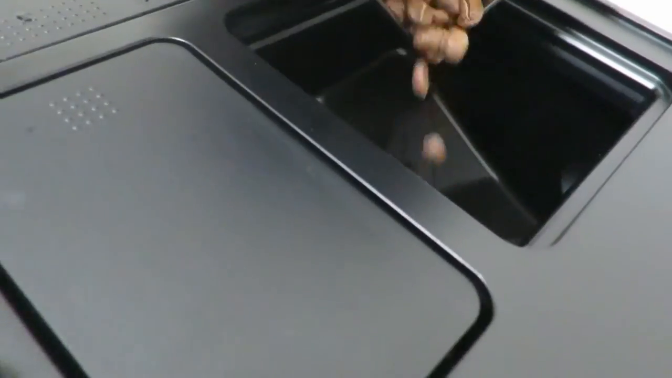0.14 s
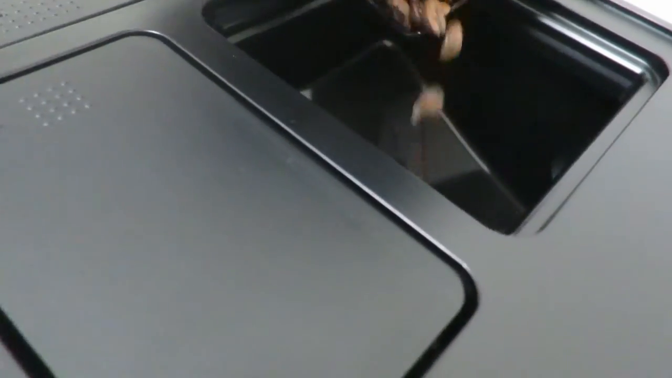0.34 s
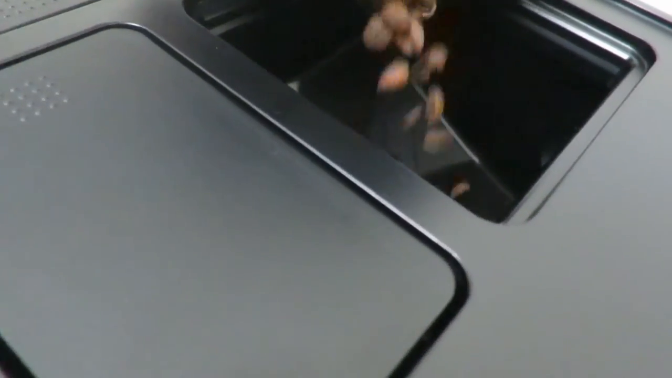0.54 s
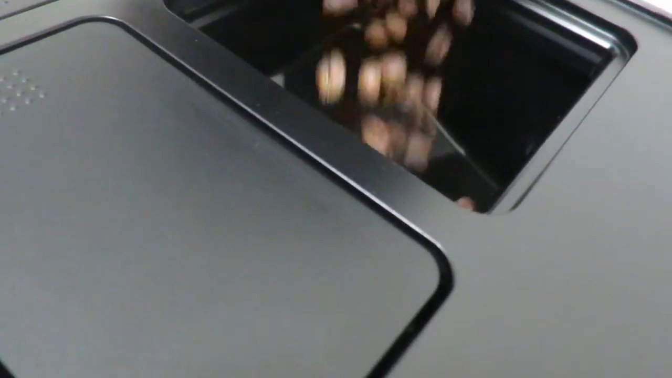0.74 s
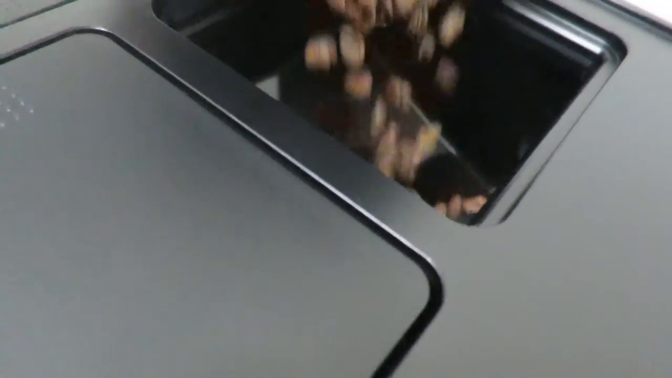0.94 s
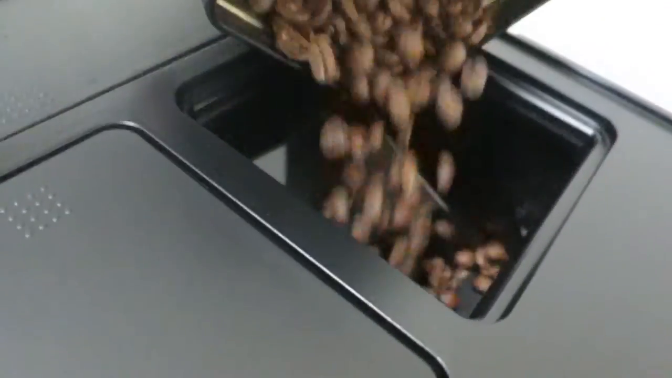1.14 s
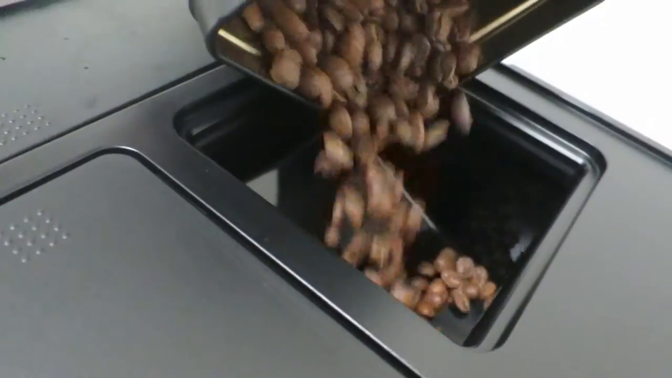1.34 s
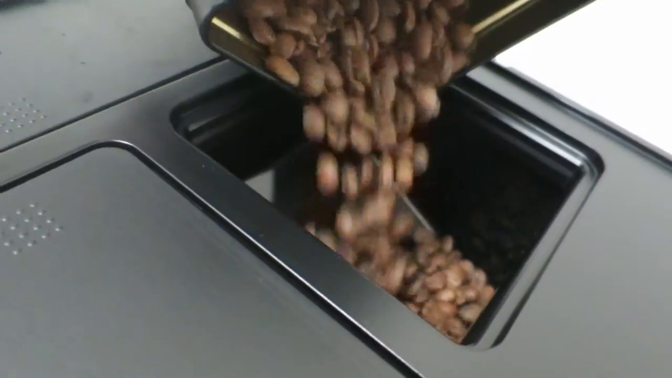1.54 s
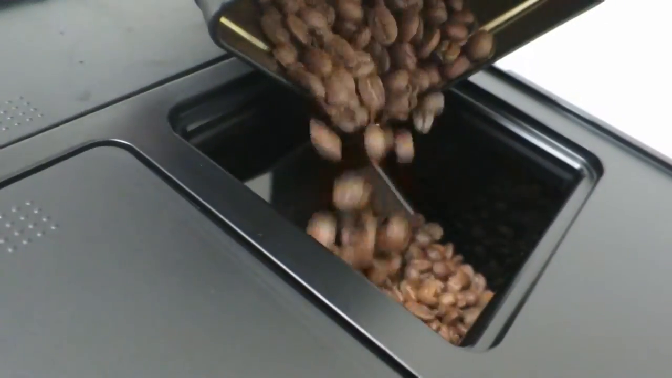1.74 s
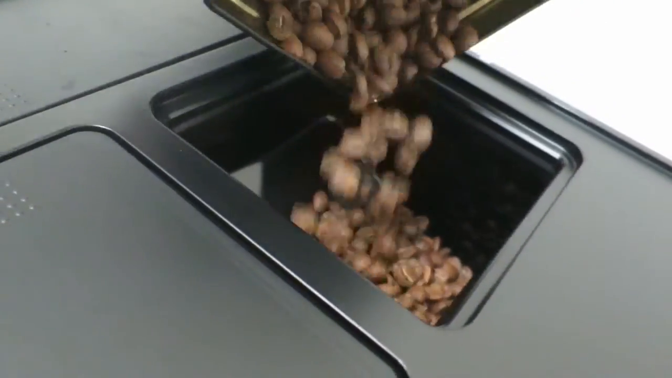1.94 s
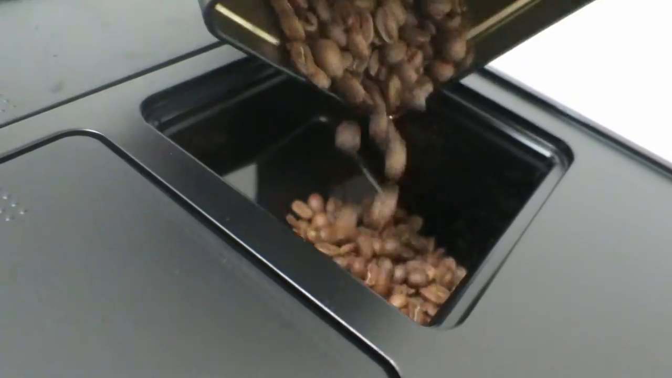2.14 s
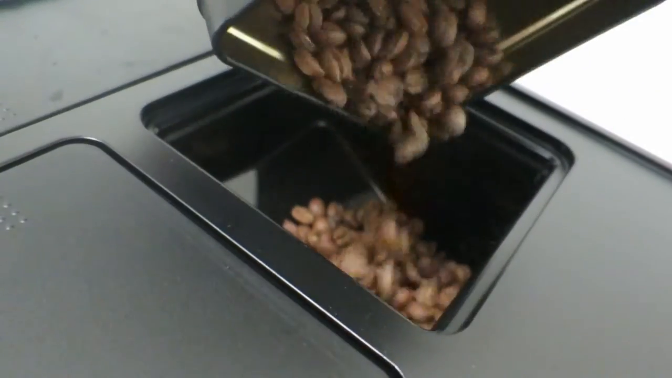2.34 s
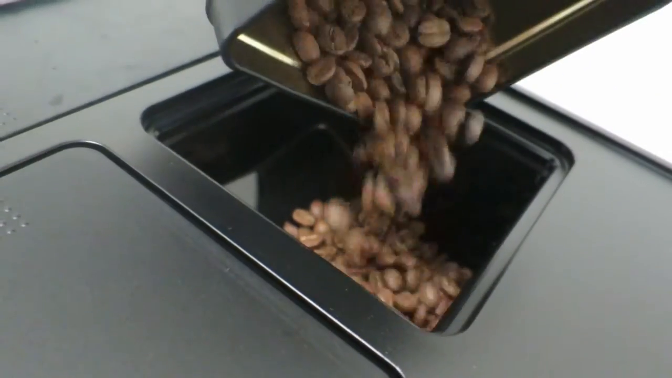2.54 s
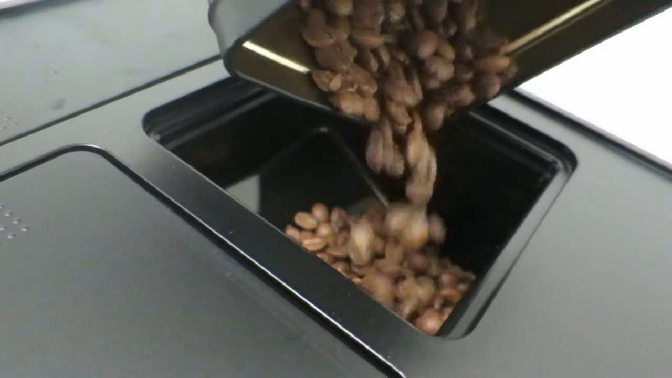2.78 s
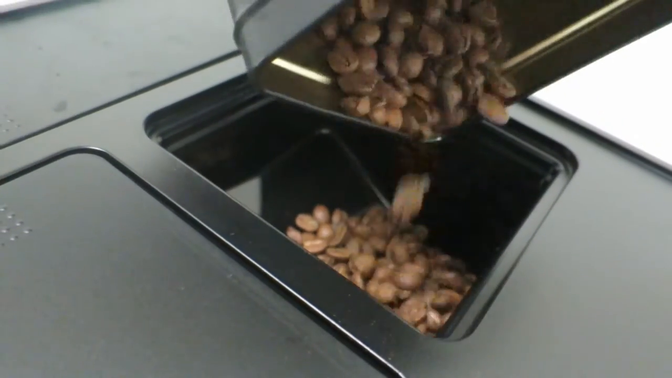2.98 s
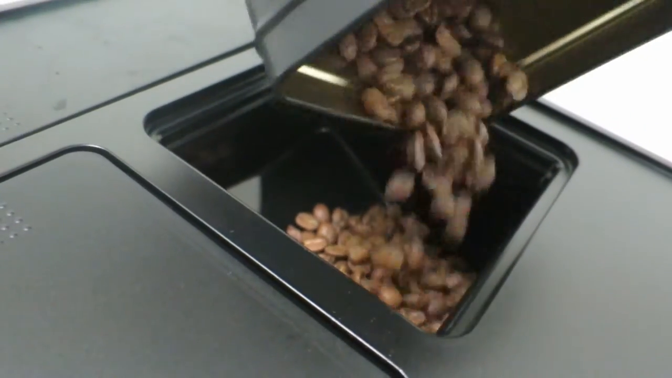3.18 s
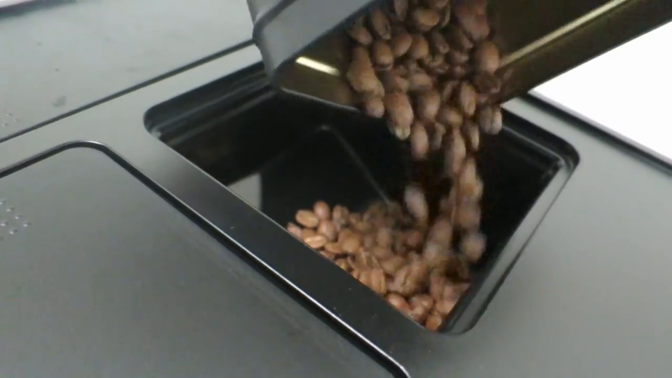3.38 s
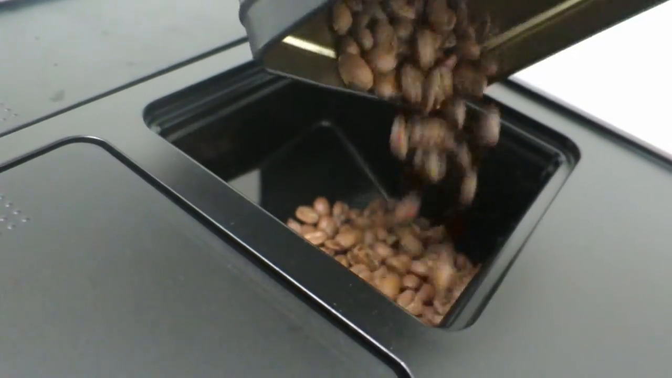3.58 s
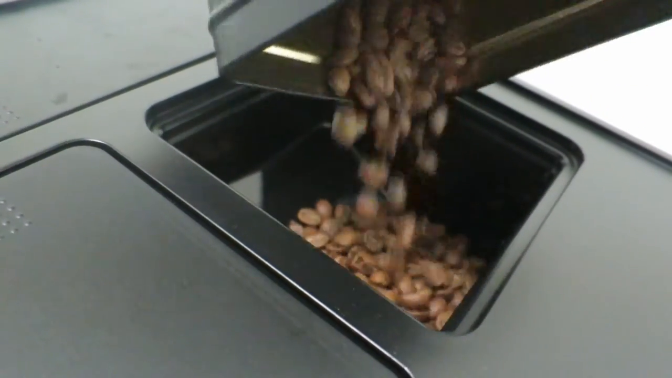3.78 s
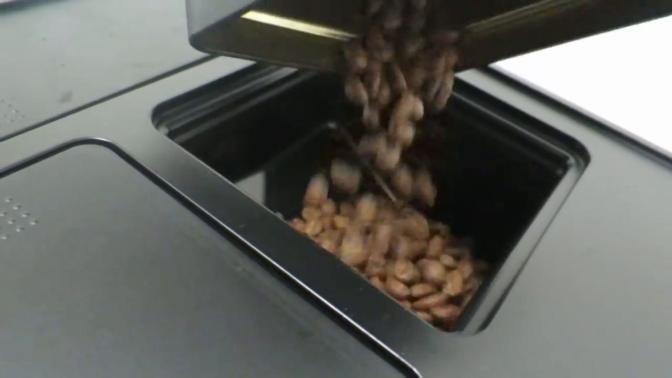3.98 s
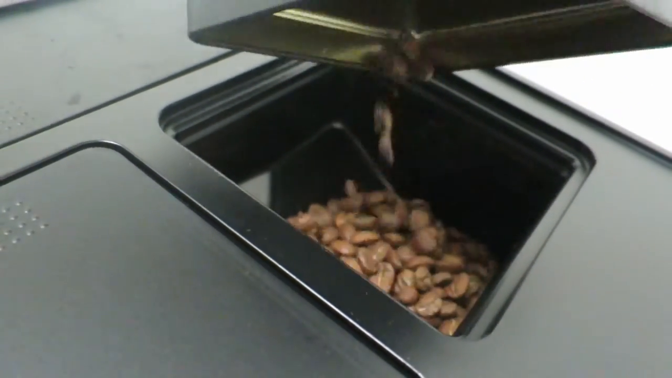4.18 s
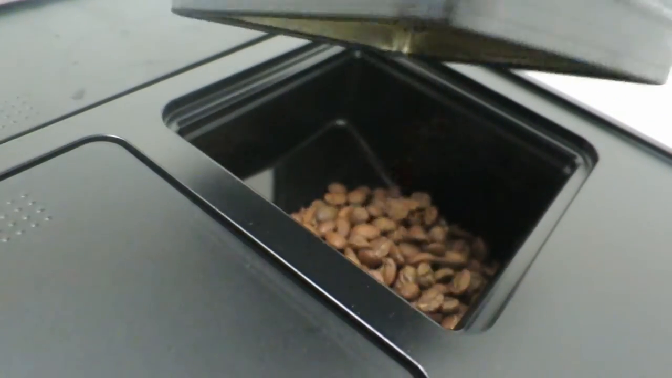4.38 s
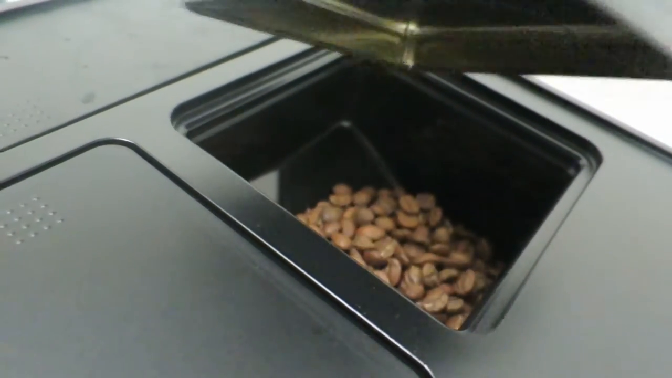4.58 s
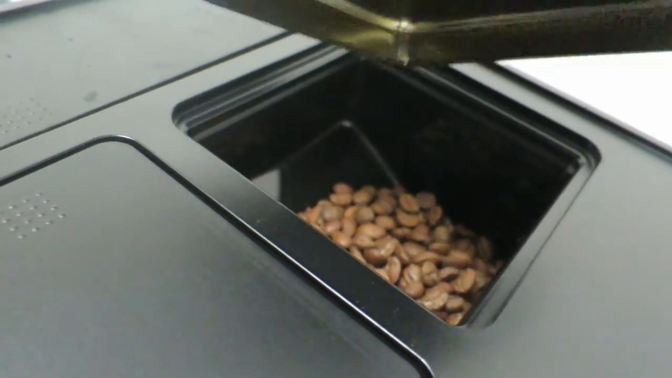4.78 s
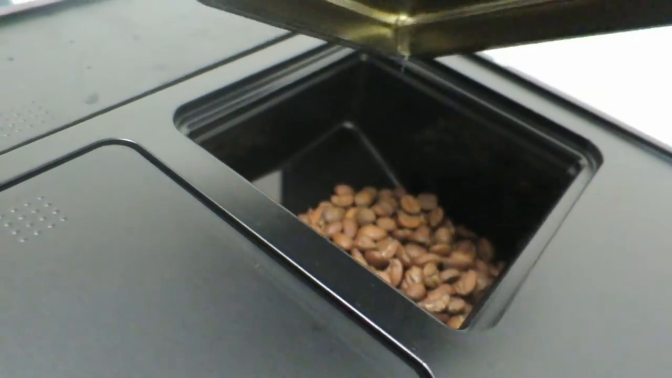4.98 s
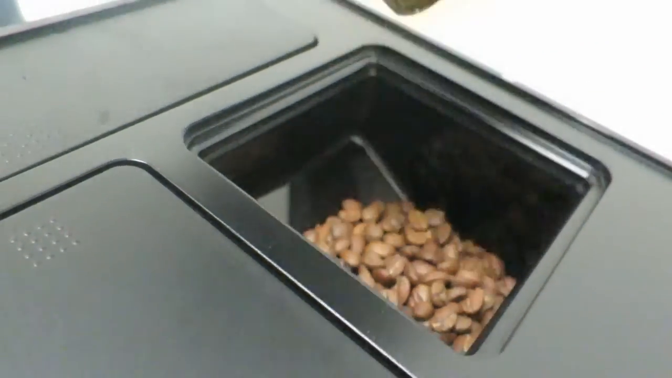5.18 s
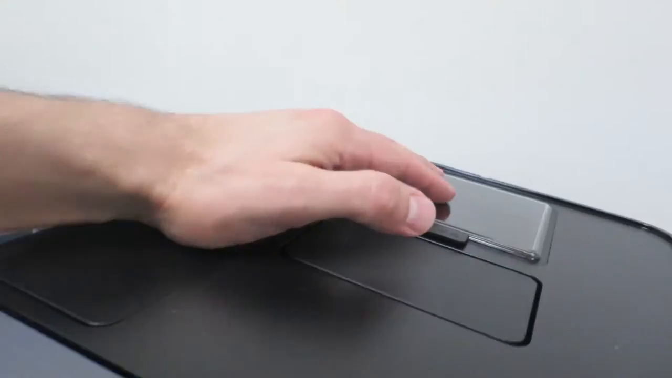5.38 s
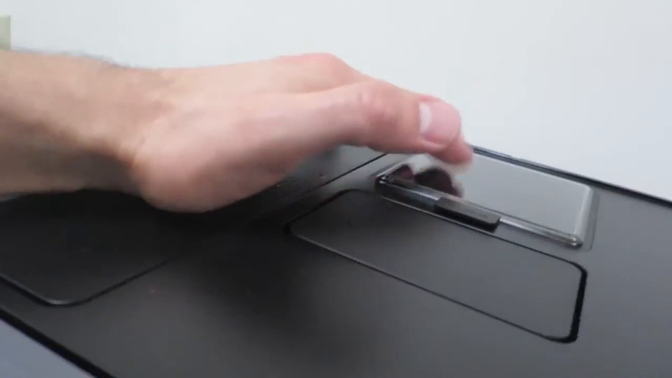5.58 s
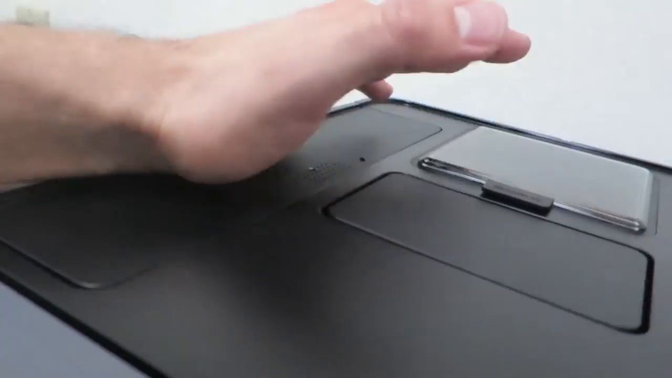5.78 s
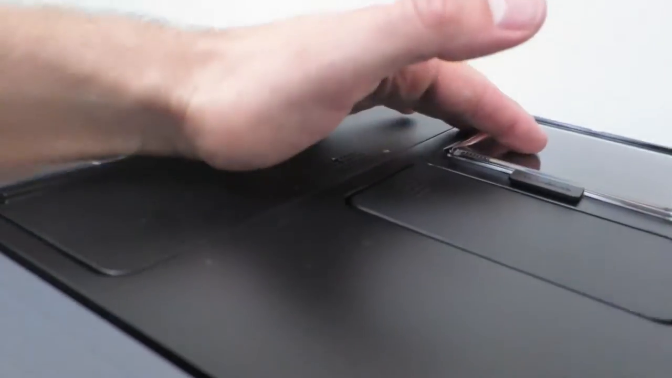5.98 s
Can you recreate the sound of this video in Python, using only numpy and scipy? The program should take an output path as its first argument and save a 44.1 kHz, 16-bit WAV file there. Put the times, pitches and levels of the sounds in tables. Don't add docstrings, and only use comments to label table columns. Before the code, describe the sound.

A quiet kitchen with low rumble, heard at arm's length or closer through a small stereo microphone. At about 0.1 s a metal cup booms softly twice as it tips, followed by a higher metallic note near 0.25 s. From 0.3 s hard roasted beans clatter into an empty plastic hopper: bright, brittle pings and cracks, a few landing on a bare panel with a short ringing note up to 1 s. The pour becomes a dense, crackling rattle, faltering and surging, its hollow drumming turning more muffled after 2 s as beans land on beans. It thins from 4.2 s and stops around 4.5 s, with tiny settling ticks at 4.55 and 4.7 s. Near quiet follows while the rumble returns. At 5.35 s a palm touches the lid, a sharp click comes at 5.5 s, firm quick pats at 5.7 s, and a final dull push with a bright click near 5.97 s.

```python
import sys
import numpy as np
from scipy import signal
from scipy.fft import rfft, irfft, next_fast_len
from scipy.io import wavfile
from scipy.ndimage import uniform_filter1d, map_coordinates

SR = 44100
rng = np.random.default_rng(int(sys.argv[2]) if len(sys.argv) > 2 else 0)


def wav_record(signal):
    frames = np.transpose(np.atleast_2d(signal))
    bounded = np.clip(frames, -1, 1)
    quanta = np.round(bounded * 32767).astype(np.int16)
    wavfile.write(sys.argv[1], SR, quanta)


def gain_from_db(level_db):
    decades = np.asarray(level_db, float) / 20
    return 10 ** decades


N = 265746
END_S = 6.027

# (time [s], level [dB])
RUMBLE_LEVEL = [(0, -30), (.12, -26), (.5, -49), (1.04, -52), (1.33, -79), (1.6, -55), (2.6, -42),
                (4.2, -44), (5.27, -39), (5.37, -33.5), (6.03, -29.5)]
# (time [s], level [dB])
HISS_LEVEL = [(4.5, -48.5), (4.55, -53), (5.2, -53.5), (5.4, -45), (6.03, -45.5)]
# (frequency [Hz], density [dB per Hz])
RUMBLE_COLOUR = [(12, -39), (20, -1), (118, 3.5), (221, -8), (255, -16), (282, -4.5), (338, -5.5),
                 (390, -9), (528, -15), (2500, -55.5), (3250, -69), (5500, -120)]
# (frequency [Hz], density [dB per Hz])
HISS_COLOUR = [(600, -6.5), (1000, -3.5), (2300, -11), (6000, -19.5), (12000, -23.5), (16000, -23.5)]
# (frequency [Hz], t60 [s])
KITCHEN_DECAY = [(200, .25), (2000, .12), (12000, .045)]
# (frequency [Hz], level [dB])
PAIR_WIDTH = [(25, -21), (60, -24), (150, -6.5), (400, -8), (1000, -6), (2500, -9), (5000, -0.5),
              (12000, 3)]
# (frequency [Hz], level [dB])
OVERALL_TONE = [(20, -20), (1000, 0.5), (3000, 3.5), (7000, 1.5), (10000, 0), (13000, 2), (15700, -1.5),
                (15950, -34.5), (16600, -58)]

# (time [s], level [dB])
PALM_WEIGHT = [(5.3, -52), (5.37, -25), (5.41, -37), (5.746, -30.5), (5.77, -43), (5.836, -29),
               (5.932, -55), (5.95, -48), (6.026, -38)]
# (time [s], length [s], level [dB])
SKIN_RUBS = [
    (5.379, .035, -46),
    (5.77, 0.027, -56),
    (5.986, 0.057, -52),
]
# (frequency [Hz], density [dB per Hz])
THUMP_COLOUR = [(15, -22.5), (45, 3), (70, -1), (130, -10), (300, -71)]
# (frequency [Hz], density [dB per Hz])
RUB_COLOUR = [(1500, -27), (5000, -10), (12000, -7), (16000, -16.5)]
# (time [s], peak [dB], brightness [dB], length [s])
LID_PATS = [
    (5.339, -32, 0, 0.034),
    (5.379, -24, -12, 0.055),
    (5.509, -46, -15, 0.019),
    (5.701, -16.5, -7, 0.035),
    (5.725, -17.5, -10, 0.021),
    (5.76, -15.5, -6.5, 0.02),
    (5.951, -13.5, -15, 0.039),
    (5.973, -13.5, 0.5, 0.025),
    (6.019, -13.5, -26, 0.05),
]
# (frequency [Hz], width [Hz], level [dB])
LID_MODES = [(54.5, 32, -2), (119.5, 22, 3.5), (163, 69, -1.5), (330, 83, -2), (515, 130, -8),
             (800, 210, -7.5), (990, 200, -8), (1450, 450, -14.5), (2740, 1000, -49)]
# (time [s], peak [dB], pitch [Hz])
EDGE_TICKS = [(4.5565, -27, 11700), (4.6976, -31.5, 12400), (5.3288, -35, 12040), (5.5257, -11, 13300),
              (5.7184, -23, 11000), (5.7618, -39, 6350), (5.9733, -14.5, 13900), (6.0254, -38, 6480)]
# (time [s], peak [dB], pitch [Hz], t60 [s])
BODY_NOTES = [
    (.103, -15, 320, 0.16),
    (.128, -12, 322, 0.13),
    (.256, -14.5, 702, .07),
    (4.572, -27, 740, 0.032),
    (4.582, -28, 330, 0.087),
    (4.702, -22, 334, .04),
    (4.703, -35, 764, 0.046),
]
# (time [s], peak [dB])
PANEL_HITS = [
    (.388, -28.5),
    (.657, -32.5),
    (.82, -28),
    (1.03, -32.5),
]

# (time [s], body [0 cup, 1 empty hopper, 2 bean bed])
STRUCK_BODY = [
    (0, 0.25),
    (.27, 0.31),
    (.29, 1.145),
    (2.0, 0.917),
    (2.5, 1.576),
    (4.6, 1.6),
]
# (frequency [Hz], width [Hz], level [dB])
CUP_MODES = [(320, 41, 2), (476, 94, 4.5), (719, 47, 17), (2130, 40.6, -15), (2460, 83, -3), (3420, 637, 8),
             (4930, 510, 3.5), (6770, 800, -20)]
# (frequency [Hz], width [Hz], level [dB])
HOPPER_MODES = [(330, 65, -17.5), (494, 39, -4.5), (652, 52, -3.5), (906, 126, -9), (1455, 81, 3.5),
                (2117, 26, 2), (3517, 1050, 0.5), (5000, 470, 10.5), (6580, 900, 5.5)]
# (frequency [Hz], width [Hz], level [dB])
BED_MODES = [(360, 35, -2), (504, 41, -2), (711, 154, 0), (1368, 220, -4.5), (1990, 140, -13.5),
             (3380, 300, -14), (5010, 1280, 1)]
# (frequency [Hz], density [dB per Hz])
CRACK_COLOUR = [(500, -35), (1300, 0.5), (3500, -1), (7000, -2), (10000, 4), (16000, -27.5)]
# (frequency [Hz], density [dB per Hz])
HUSK_COLOUR = [(4000, -50.5), (8000, -7), (11500, 5), (14000, 6), (16500, -7.5)]
# (time [s], level [dB])
FLOW_LEVEL = [(0, -37.5), (.13, -22), (.264, -24.5), (.283, -19), (.3, -36), (.46, -24), (.66, -36),
              (.72, -23), (1.12, -26.5), (1.75, -25.5), (2.2, -30), (2.78, -29), (2.95, -29), (3.45, -27.5),
              (3.7, -28), (4.1, -26.5), (4.3, -35.5), (4.52, -47.5)]
# (time [s], length [s], depth [dB])
LIP_STALLS = [(.5, 0.06, 7), (.565, 0.0093, 5.5), (.64, 0.026, 5), (.745, .01, 13.5), (1.43, 0.042, 5),
              (2.07, .02, 7), (2.32, 0.096, 9), (2.55, 0.023, 5.5), (3.03, .05, 8), (3.13, 0.13, 6),
              (3.68, 0.02, 8.5), (3.8, 0.07, 7)]
PING_OVER_FLOW = [-14, 6, 5.5]
DRUM_OVER_FLOW = [3.5, -10, -3.5]
PING_GROWS, DRUM_GROWS, USUAL_DB = 1.17, 0.68, -26.5

# (time [s], peak [dB], ping [Hz],
# clack [dB])
STRAY_BEANS = [(0.0347, -16, 11600, -40.5), (0.0738, -11.5, 15000, -16.5), (0.0904, -4, 12500, -16.5),
               (0.1331, -1.5, 12300, -28.5), (0.176, -6.5, 7950, -15.5), (0.2415, -18.5, 11400, -3.5),
               (0.2585, 1, 11100, -20), (0.277, 8, 12400, -9), (0.318, -1, 10300, -29.5),
               (0.3415, 2.5, 11200, -22.5), (0.3677, 2, 12600, -19.5), (0.385, -0.5, 12100, -13),
               (0.405, -9, 10500, -25.5), (0.418, 2, 10100, -23.5), (0.4266, 1.5, 12600, -19.5),
               (0.4543, -1, 13000, -28), (0.4625, 4, 11170, -19.5), (0.4764, -9, 13000, -25),
               (0.5072, -5, 13100, -30.5), (0.5217, -5, 11640, -35), (0.529, -1, 13200, -23.5),
               (0.5534, 1, 11400, -24.5), (0.5741, -6, 11500, -23), (0.5985, -18, 11400, -19),
               (0.6566, -8, 11300, -33.5), (0.686, -6.5, 11500, -22.5), (0.7035, -3.5, 9160, -39),
               (0.7246, -13, 12200, -25), (0.754, -1, 11100, -26),
               (0.7843, -5, 13300, -20), (0.8302, -12, 11700, -28), (0.8537, 2, 11200, -17.5),
               (0.8916, 1.5, 10500, -19), (1.2607, -3, 11200, -31), (1.309, -2.5, 13600, -24),
               (1.4665, -2.5, 11440, -36.5), (1.5341, -3, 13100, -34), (1.5578, -3, 12800, -23.5),
               (1.6469, -3.5, 9500, -36), (1.6783, -21.5, 12500, -56.5), (1.7511, -1, 8810, -18.5),
               (1.8626, -10.5, 14000, -20.5), (1.8848, 0, 14300, -24.5), (2.0859, -5, 12600, -23.5),
               (2.2494, -6, 13600, -30), (2.2702, 1, 12100, -37), (2.3003, -10, 14200, -45),
                (2.3288, -4.5, 12900, -40.5), (2.359, -15.5, 13500, -25.5), (2.405, -16, 11800, -26.5),
                (2.434, -5.5, 14700, -34), (2.4465, 0.5, 14500, -46), (2.4786, -2.5, 13200, -26),
                (2.5475, -16.5, 11800, -37), (2.57, -13, 14600, -33), (2.6232, -7, 12700, -19),
                (2.6962, -17, 13900, -44), (2.7114, 1.5, 12900, -36), (2.7715, 1, 13000, -39),
                (2.8953, -16, 12700, -38), (2.9262, -8, 12700, -25), (2.9743, 1, 14100, -44),
                (3.006, -7.5, 13900, -37.5), (3.031, -16.5, 14600, -44), (3.0481, -1.5, 13000, -50),
                (3.0651, 1, 12400, -30), (3.1442, -3, 12500, -41), (3.1883, -7, 11600, -26),
                (3.2235, -7, 12600, -21), (3.2513, -4, 13000, -24.5),
               (3.264, 2.5, 12900, -34), (3.288, -16, 12200, -56), (3.3038, 4, 13900, -19.5),
                  (3.3594, -12, 12740, -60), (3.3707, -6, 9800, -37.5), (3.415, -9, 12800, -31.5),
                  (3.456, -0.5, 12600, -22.5), (3.463, 5, 12600, -18.5), (3.6017, 1.5, 13200, -36.5),
                  (3.6926, -3, 12300, -28), (3.7528, 2, 12600, -37), (3.8275, -1.5, 12900, -25),
                  (3.876, -9, 13800, -42), (3.9055, -16.5, 13800, -30.5), (3.935, -5.5, 14200, -29),
                  (4.0639, -5.5, 13600, -26), (4.089, -3.5, 14000, -24),
               (4.2337, -7, 12800, -35), (4.2603, -3.5, 10700, -30), (4.3081, -18, 14000, -41.5),
               (4.338, -6.5, 12200, -24), (4.3531, -8, 11800, -23.5), (4.3851, -8, 13100, -24),
               (4.407, -9, 14900, -34.5), (4.4225, -12.5, 12500, -35), (4.4397, -9.5, 13500, -27),
               (4.5117, -16, 12700, -34)]


def unit(x):
    return x / np.sqrt(np.mean(x ** 2) + 1e-20)


def along(points, hz):
    f, v = np.transpose(points)
    return np.interp(np.log(hz + 1), np.log(f + 1), v)


def curves(rows):
    s, *cols = np.transpose(rows)
    return [np.interp(np.arange(N) / SR, s, c) for c in cols]


def swells(rows):
    t = np.arange(N) / SR
    return sum(height * np.exp(-((t - s) / abs(length_s)) ** 2) for s, length_s, height in rows)


def wobble(rate):
    knots = rng.standard_normal(int(N * rate / SR) + 4)
    return map_coordinates(knots, [np.arange(N) * rate / SR])


def filtered(x, response):
    m = next_fast_len(N + SR // 2)
    return irfft(rfft(x, m) * response(np.fft.rfftfreq(m, 1 / SR)), m)[..., :N]


def modes(peaks):
    def response(f):
        return sum((-1) ** k * gain_from_db(db) * 1j * f * w / (c * c - f * f + 1j * f * w)
                   for k, (c, w, db) in enumerate(peaks))
    return response


def steady(x):
    power = np.mean(x ** 2, 0)
    slow = uniform_filter1d(uniform_filter1d(power, SR // 12), SR // 12)
    return x / np.sqrt(np.abs(slow) + 1e-12)


def noise(spectrum, alike):
    mid, side = filtered(rng.standard_normal((2, N)), lambda hz: gain_from_db(along(spectrum, hz)))
    apart = np.sqrt(np.clip((1 - alike) / (1 + alike), 0, 1))
    return unit(np.array([mid + apart * side, mid - apart * side]))


def grains(s, hz, t60, db, pan_db, lag_s, size=256):
    t = np.arange(size) / SR
    pitch = hz[:, None]
    at = np.clip(np.round(s * SR).astype(int), 0, N)[:, None] + np.arange(size)
    fade = gain_from_db(db[:, None] - 60 * t / t60[:, None]) * (1 - np.exp(-t * pitch / 0.74)) ** 2
    ears = []
    for side in (1, -1):
        level = fade * gain_from_db(side * pan_db / 2)[:, None]
        wave = level * np.sin(2 * np.pi * pitch * (t + side * lag_s[:, None] / 2))
        ears.append(np.bincount(at.ravel(), wave.ravel(), N + size)[:N])
    return np.array(ears)


def bursts(s, db, t60, spectrum, alike):
    power = np.bincount(np.round(s * SR).astype(int), gain_from_db(2 * db), N)[:N]
    power = signal.lfilter([1], [1, -gain_from_db(-120 / (t60 * SR))], power)
    return np.sqrt(np.abs(power)) * noise(spectrum, alike)


def kitchen_air():
    rumble_db, = curves(RUMBLE_LEVEL)
    hiss_db, = curves(HISS_LEVEL)
    rumble = gain_from_db(rumble_db + 3 + 1.5 * wobble(12)) * noise(RUMBLE_COLOUR, alike=.88)
    return rumble + gain_from_db(hiss_db) * noise(HISS_COLOUR, alike=.6)


def echo(x):
    hz, t, z = signal.stft(rng.standard_normal((2, SR // 3)), SR, nperseg=128)
    decay = gain_from_db(-60 * t / along(KITCHEN_DECAY, hz)[:, None])
    tail = signal.istft(z * decay, SR, nperseg=128)[1]
    tail = tail[0] + .6 * tail[1] * np.array([[1], [-1]])
    late = np.pad(np.mean(x, 0), (60, 0))[None]
    return signal.fftconvolve(late, tail / np.linalg.norm(tail[0]), axes=1)[:, :N]


def palm():
    thump_db, = curves(PALM_WEIGHT)
    resting = np.arange(N) > 5.3 * SR
    thump = gain_from_db(thump_db + 12.0) * noise(THUMP_COLOUR, alike=0.31)
    rub = swells([(s, length_s, gain_from_db(db)) for s, length_s, db in SKIN_RUBS])
    return resting * thump + rub * noise(RUB_COLOUR, alike=0.33)


def pats():
    bright, dull, t = np.zeros(N + SR), np.zeros(N + SR), np.arange(SR // 8) / SR
    for s, db, bright_db, length_s in LID_PATS:
        u = t / max(length_s, .004)
        jolts = rng.standard_normal(len(t)) * 2 * np.sqrt(u) * np.exp(-2 * u ** 2)
        dull[round(s * SR):][:len(t)] += gain_from_db(db + 27.5) * jolts
        bright[round(s * SR):][:len(t)] += gain_from_db(db + bright_db + 14) * jolts * np.exp(-u)
    lid = modes(LID_MODES)

    def bright_response(f):
        bass_cut = (1j * f / 600) / (1 + 1j * f / 600)
        return (lid(f) + 0.14) * bass_cut / (1 + 1j * f / 2500) ** 2

    soft = filtered(dull[:N], lambda f: lid(f) / (1 + 1j * f / 500) ** 2)
    return soft + filtered(bright[:N], bright_response)


def ticks():
    s, db, hz = np.transpose(EDGE_TICKS)
    lag_s = 2e-5 * rng.standard_normal(len(s))
    ring = grains(s + 0.0012, hz, .002 + 0 * s, db + 3, 0 * s, lag_s)
    return ring + bursts(s + 0.00082, db - 12, 0.01, HUSK_COLOUR, alike=0.5)


def body_notes():
    s, db, hz, t60 = np.transpose(BODY_NOTES)
    return grains(s, hz, t60, db, 0 * s, 0 * s, size=4096)


def panel():
    s, db = np.transpose(PANEL_HITS)
    pitch_hz, t60_s = 2084, 0.15
    return grains(s, pitch_hz + 0 * s, t60_s + 0 * s, db, 0 * s, 0 * s, size=4096)


def walls(blows):
    fill, = curves(STRUCK_BODY)
    bodies = [CUP_MODES, HOPPER_MODES, BED_MODES]
    return sum(unit(filtered(blows, modes(body))) * np.clip(1 - abs(fill - k), 0, 1)
               for k, body in enumerate(bodies))


def bean(s, db, hz, luck):
    t60_s = .004 * np.exp(.3 * luck[:, 1])
    ping = grains(s, hz, t60_s, db, 1.2 * luck[:, 3], 1.3e-5 * luck[:, 0])
    return ping + bursts(s, db - 9, .011, HUSK_COLOUR, alike=.7)


def contacts(count, clump_db, spread_db):
    crowd = np.cumsum(gain_from_db(clump_db * wobble(35)) * (np.arange(N) < 4.5 * SR))
    draw = rng.random((count, 2))
    s = np.interp(draw[:, 0], crowd / crowd[-1], np.arange(N) / SR)
    db = -spread_db * np.log(draw[:, 1] + 40 / count)
    return s, db, rng.standard_normal((count, 6))


def stream():
    clack_db = curves(FLOW_LEVEL)[0] - swells(LIP_STALLS)
    fill, = curves(STRUCK_BODY)
    swing_db = clack_db - USUAL_DB
    ping_db = USUAL_DB + PING_GROWS * swing_db + np.interp(fill, np.arange(3), PING_OVER_FLOW)
    drum_db = USUAL_DB + DRUM_GROWS * swing_db + np.interp(fill, np.arange(3), DRUM_OVER_FLOW)
    s, db, luck = contacts(count=11000, clump_db=3.5, spread_db=4.2)
    usual_hz = np.interp(s, [0, 4.5], [11500, 13200])
    hz = np.clip(usual_hz * np.exp(0.22 * luck[:, 4]), 6000, 15800)
    ping = bean(s, db + 3 * luck[:, 5], hz, luck)
    clack = bursts(s, .85 * db, .013, CRACK_COLOUR, alike=.85)
    blows = rng.standard_normal(N) * np.abs(clack[0])
    drum = filtered(walls(blows), lambda f: 1 / (1 + 1j * f / 1000) ** 3)
    clatter = steady(.7 * unit(clack) + .8 * unit(walls(clack)))
    flow = gain_from_db(ping_db - 2) * steady(ping) + gain_from_db(clack_db - 2) * clatter
    return (np.arange(N) < 4.52 * SR) * (flow + gain_from_db(drum_db) * steady(drum[None]))


def strays():
    rows = STRAY_BEANS
    s, db, hz, clack_db = np.transpose(rows)
    luck = rng.standard_normal((len(s), 4, 6))
    rebound = np.arange(4) / 3
    rattle_s = .003 * gain_from_db(.5 * db)[:, None]
    times = s[:, None] + .001 + rattle_s * (rebound + .1 * luck[..., 4] * rebound)
    loss_db = 2 - 12 * rebound - 5 * (rebound > 0)
    pitch_hz = np.clip(hz[:, None] * (1 + 0.095 * luck[..., 5] * (rebound > 0)), 5000, 15800)
    ping_db = db[:, None] + loss_db - 5.5
    crack_db = np.minimum(clack_db, -15)[:, None] + loss_db + 1.5
    pings = bean(times.ravel(), ping_db.ravel(), pitch_hz.ravel(), luck.reshape(-1, 6))
    crack = bursts(times.ravel(), crack_db.ravel(), .012, CRACK_COLOUR, alike=.85)
    return pings + .75 * crack + .6 * np.std(crack) * walls(crack)


def pour():
    return stream() + strays()


def scene():
    near = pour() + panel() + pats() + ticks() + body_notes()
    return near + gain_from_db(-11) * echo(near) + kitchen_air() + palm()


def top_cut(x):
    return signal.sosfilt(signal.butter(12, 16500, fs=SR, output="sos"), x)


def record(dry):
    mid = (dry[0] + dry[1]) / 2
    side = filtered((dry[0] - dry[1]) / 2, lambda hz: gain_from_db(along(PAIR_WIDTH, hz)))
    x = filtered(np.array([mid + side, mid - side]), lambda hz: gain_from_db(along(OVERALL_TONE, hz)))
    x = x / (1 + np.abs(x / .99) ** 8) ** (1 / 8)
    return top_cut(x * (np.arange(N) < END_S * SR))


dry = scene()
out = record(dry)
wav_record(out)
```